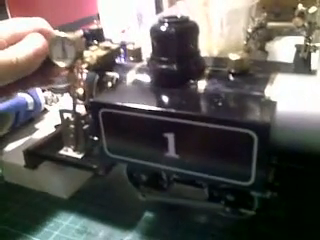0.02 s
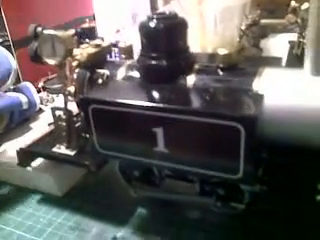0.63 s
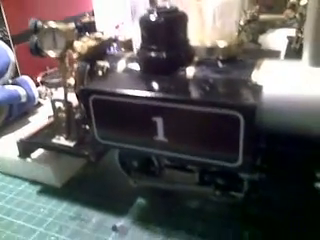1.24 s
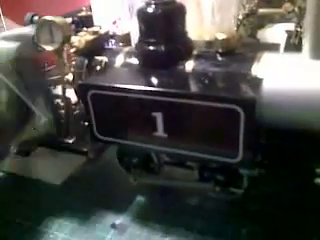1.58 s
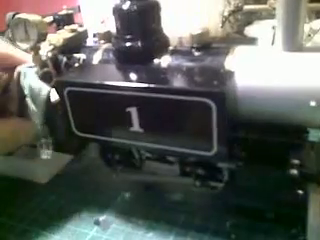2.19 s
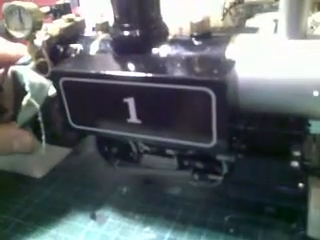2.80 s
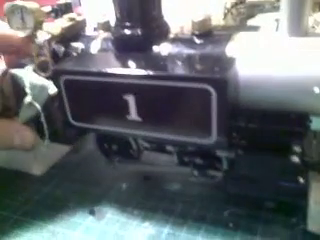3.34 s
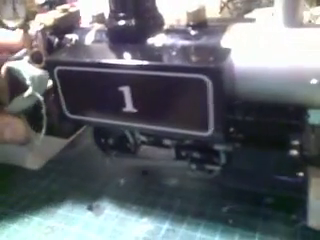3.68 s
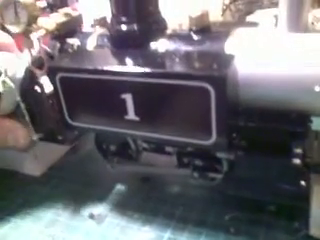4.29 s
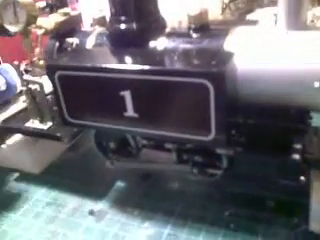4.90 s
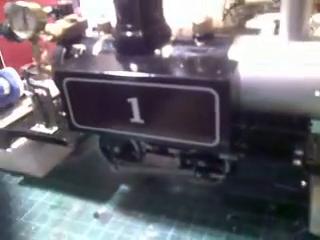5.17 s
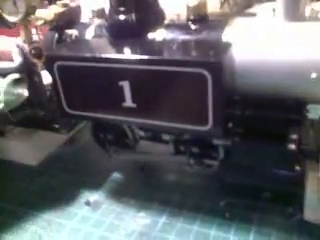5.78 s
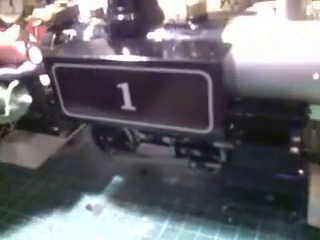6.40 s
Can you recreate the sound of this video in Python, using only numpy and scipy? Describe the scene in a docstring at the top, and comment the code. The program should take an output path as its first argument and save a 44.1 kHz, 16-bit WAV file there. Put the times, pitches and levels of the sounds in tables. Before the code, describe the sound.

Close up in a small room, small metal fittings click and clink unevenly as someone handles a model steam engine. Beneath them run a low, steady flame roar and a faint wet sputter. In the second half a rag rubs, metal scrapes and several knocks shake the stand, while a soft steam hiss grows. The clicking thins out and the steam gives a few short spurts.

```python
"""A workbench in a small room, the microphone close to a model live-steam locomotive standing in steam.
Up front, a hand works the cab fittings with a rag: metal clicks, rings and scrapes, the rag swishes,
and a few blows thud through the frame into the stand. Bench, boiler and walls answer each of them.
Underneath, the burner's flame roars softly in the flue, a wet leak fizzes and wavers,
and a jet of steam swells in the second half, with a few spurts near the end."""
import sys
import numpy as np
from scipy import signal
from scipy.fft import rfft, irfft
from scipy.io import wavfile
from scipy.ndimage import uniform_filter1d

SR = 44100
rng = np.random.default_rng(int(sys.argv[2]) if len(sys.argv) > 2 else 0)


def unload_audio(sound):
    """Save the sound as a 16-bit wav file, at the path given as the first command line argument."""
    columns = np.transpose(np.atleast_2d(sound))
    # keep every value between -1 and 1, then stretch to whole-number steps
    steps = np.round(np.clip(columns, -1, 1) * 32767)
    wavfile.write(sys.argv[1], SR, steps.astype(np.int16))


N = 292824
TIME = np.arange(N) / SR
RING_PER_KNOCK = -0.27  # dB of ring per dB of knock: firm knocks damp the free fitting

# Cab fittings clicking close to the microphone. Each row: start in seconds, relative level in dB,
# knock below 2 kHz in dB, brightness above 5 kHz in dB, chatter decay in seconds.
CLICKS = [(.038, -40.5, 0, 1, 0.0036), (0.054, -41, 3, 4, 0.0018), (.112, -33.5, -17, -5, .0026),
          (.158, -49, -8, -3, .002), (.222, -49, -8, -5, .002), (.273, -44.5, -12, -14, .002),
          (.396, -50, -6, 1, .002), (.462, -40, 10.5, -1, 0.0057), (.499, -33, 1, -8.5, 0.0011),
          (.573, -42.5, -10, -12, 0.003), (.607, -37.5, -22, -21, 0.0028), (.668, -34.5, -23, 1, 0.0045),
          (0.8184, -39, -6, 0.5, 0.0025), (.98, -38.5, -9, -23, 0.0016), (1.042, -30.5, -1, -3.5, 0.0016),
          (1.3275, -44, -13, -4, 0.0013), (1.418, -47.5, -10, -5, .001), (1.4844, -43, 9, -3, 0.0039),
          (1.644, -45.5, -6, -4, 0.005), (1.8468, -24.5, -9, -8.5, 0.0024), (1.852, -30.5, -9, -5, 0.0053),
          (2.0525, -46, -11, 3, 0.0015), (2.136, -48, -2, 4.5, .0026), (2.277, -40, -10, 1, 0.0026),
          (2.281, -28, -4, -6.5, 0.012), (2.3555, -30, -17, -4, 0.0033), (2.365, -28.5, -14, -15, 0.0038),
          (2.3862, -28, -19, -7, 0.0024), (2.455, -44.5, -9, -8, 0.0022), (2.755, -47.5, -8, 4, 0.0016),
          (2.786, -37, -3, -0.5, 0.0091), (2.965, -52, -6, 5, .0015), (3.085, -54, -6, 3, .002),
          (3.119, -48.5, -3, 5.5, 0.0037), (3.3101, -46.5, 14, 8.5, .0015), (3.3249, -19, -9.5, -9, 0.0011),
          (3.394, -40, -9, -12, 0.0018), (3.422, -41, -4, -10, .002), (3.456, -42.5, -8, -13, 0.0025),
          (3.48, -33, -7, -8, 0.00075), (3.53, -38.5, -3, -7, 0.0012), (3.569, -40.5, -3, -3, 0.00093),
          (3.7085, -27.5, -1.5, -1.5, .008), (3.7415, -35, 0, -5, .007), (3.766, -31.5, 1.5, -1, 0.0029),
          (3.8086, -49, -1, -13, .0015), (3.8319, -25, 1.5, -3.5, 0.003), (3.8702, -31, -2.5, -9, 0.0017),
          (3.899, -37.5, -8, -12, .0009), (3.981, -40, -15, -2, .0012), (4.014, -29, -12, -5.5, 0.0035),
          (4.1284, -35, 6, 3, 0.0026), (4.1645, -51, 9, 7, .002), (4.199, -53, -3, -4, .001),
          (4.238, -44, -7, 0, .0015), (4.262, -54, 0, -5, .001), (4.285, -39.5, 5, 2, .001),
          (4.323, -37.5, 1, 2.5, 0.0015), (4.347, -43.5, 6, 4, 0.00072), (4.362, -47.5, 7, 4.5, 0.0011),
          (4.41, -44, 8, 1, 0.00093), (4.437, -33.5, 7.5, 5.5, 0.0023), (4.469, -38, -1, -5, 0.00063),
          (4.49, -40, -12, 6.5, 0.0018), (4.529, -44, 5, 0, .0015), (4.584, -29, -12, 2.5, 0.00091),
          (4.767, -25, -2, -1.5, 0.00084), (4.869, -44, 2, -2, 0.0011), (4.888, -40.5, -2, 4, 0.0019),
          (4.92, -36.5, -14, 1, 0.0011), (5.162, -48.5, -8, 10, .003), (5.2666, -24.5, 5, 9.5, 0.0009),
          (5.269, -27.5, 5, 8, 0.0012), (5.274, -41, -6, 4, 0.001), (5.348, -46, -7, -6, .002),
          (5.4014, -31.5, -2, 1.5, 0.003), (5.4607, -37.5, -19, 2.5, 0.0041),
          (5.515, -41.5, -13, 2, 0.0034), (5.7883, -39.5, 3, 2, 0.00085), (5.847, -46, 12, -14, 0.0014),
          (6, -44, -3, -6, 0.0035), (6.113, -40.5, 3, -3, 0.0028), (6.141, -47.5, -3, 5, .003),
          (6.1673, -40.5, -13, -6, 0.0028), (6.2656, -45.5, 17, -8, .0012), (6.491, -48.5, 2, 7.5, 0.00063)]
def clicks(rise_s=0.00018, strike_s=0.00045, sing_hz=3505, sing_t60_s=0.089, size=4096):
    """Metal meets metal in a strike and a dying chatter; one free fitting sings on after it."""
    out, t = np.zeros(N), np.arange(size) / SR
    impact = np.sqrt(.01 * SR)  # the energy of 10 ms at rms 1
    for start, db, knock_db, bright_db, decay in CLICKS:
        contact = (1 - np.exp(-t / rise_s)) * np.exp(-t / decay)
        spectrum = rfft(rng.standard_normal(size) * contact)
        # a hard contact spreads its energy evenly over the bands
        spectrum /= np.sqrt(uniform_filter1d(abs(spectrum) ** 2, size=60))
        chatter = irfft(spectrum) * (t < t[-1] / 2)
        strike_share = strike_s / (strike_s + decay)
        force = np.sqrt(strike_share) * (t == 0) + np.sqrt(1 - strike_share) * chatter
        click = metal(force, knock_db, bright_db, edge_db=-4 + 0.39 * bright_db)
        add(out, start, gain_of(db) * impact * click)
        pitch_hz = sing_hz * rng.uniform(.993, 1.007)
        sing_db = db - 16 + RING_PER_KNOCK * knock_db - 60 * t / sing_t60_s
        add(out, start, gain_of(sing_db) * np.sin(2 * np.pi * pitch_hz * t))
    return out


# The fittings' tone from close by. Each row: frequency in Hz, relative level in dB.
METAL_SPECTRUM = [(40, -30), (280, -16.5), (480, -18.5), (750, -8), (1300, -16.5), (2300, -11),
                  (3000, -12.5), (5000, -20), (7000, -14.5), (7900, -24.5), (11500, -27.5), (14000, -20),
                  (16000, -66)]
# Their main resonances and dips, then their thin notes. Each row: centre in Hz, width in Hz, lift in dB.
METAL_RESONANCES = [(670, 210, 5.5), (996, 114, 11.5), (1356, 80, -17), (1690, 800, 11), (2070, 53, -13),
                    (2872, 105, -17), (3534, 1110, 15), (6460, 860, 8.5), (8320, 150, 7.5), (9850, 1840, 6)]
METAL_NOTES = [(3265, 60, 3), (3505, 50, 1), (3781, 50, 1.5), (5650, 45, 6), (5794, 45, 7), (6460, 60, 4),
               (6610, 50, 3), (6785, 50, 5), (9572, 50, 5)]
def metal(force, knock_db, bright_db, edge_db):
    """The fittings ring under a force: heavy blows add knock, hard ones treble, light ones one note."""
    corners_hz = [1800, 2400, 3950, 5000, 10000, 11200]
    tilt = lambda hz: np.interp(hz, corners_hz, [knock_db, 0, 0, bright_db, bright_db, edge_db])
    # each point of contact favours other resonances and has high notes of its own
    rings = [(hz, width, db + rng.uniform(-1.5, 1.5)) for hz, width, db in METAL_RESONANCES + METAL_NOTES]
    rings += [(rng.uniform(6000, 13360), 170, db) for db in 8.5 * rng.uniform(-0.67, 1, size=12)]
    free_fitting_hz = 3535 * rng.uniform(.98, 1.02)
    rings.append((free_fitting_hz, 154, 3 + RING_PER_KNOCK * knock_db))
    return colour(force, lambda hz: read(METAL_SPECTRUM, hz) + lifts(rings, hz) + tilt(hz), (2300, 5000))


# Fittings scraping in their seats. Each row: start in seconds, length in seconds,
# relative level in dB, brightness above 5 kHz in dB.
SCRAPES = [(-.02, 0.14, -39.5, -1.5), (0.319, 0.24, -53, 1), (3.335, 0.059, -43, 1.5),
           (3.491, .14, -50, -10), (3.711, 0.13, -41, -5.5), (3.824, 0.084, -61, -4), (4.137, 0.12, -50, 3),
           (4.287, 0.27, -64, -6), (4.593, 0.038, -51, 5), (4.87, 0.17, -60.5, 10.5),
           (5.276, .07, -51, -12), (5.982, 0.034, -59, 8)]
def scrapes(knock_db=-4, clump_db=3, clump_hz=70):
    """Metal rubs on metal in a crowd of small slips that come in clumps under a soft stroke."""
    out = np.zeros(N)
    for start, length, db, bright_db in SCRAPES:
        count = round(length * SR)
        slips = evened(grains(1100, 2.8, count) * gain_of(clump_db * flutter(clump_hz, count)))
        force = np.pad(slips * signal.windows.tukey(count, .4), (0, SR // 20))
        add(out, start, gain_of(db) * metal(force, knock_db, bright_db, edge_db=bright_db - 2))
    return out


# Rag, fingers or a tool sliding over the cab. Each row: start in seconds, length in seconds, level in dB.
SWISHES = [(0.377, 0.12, -57), (0.855, 0.035, -54), (1.27, 0.036, -56), (1.467, 0.053, -57),
           (4.126, 0.13, -51), (4.28, 0.27, -49), (4.585, 0.025, -52), (5.262, 0.017, -32),
           (5.294, 0.105, -48.5), (5.929, 0.1, -57.5), (6.102, 0.042, -53), (6.4, 0.018, -64),
           (6.483, 0.029, -53.5)]
# The tone of the sliding. Each row: frequency in Hz, relative level in dB.
SWISH_SPECTRUM = [(500, -21), (2200, 14), (2900, -19), (3500, -3), (4900, 10.5), (5600, 0), (6600, -10),
                  (7700, -7), (8700, 0), (9300, 2), (10100, 7.5), (11200, -16), (14000, -6), (15200, -41)]
def swishes(clump_db=6, clump_hz=90):
    """Surfaces catch and slip under each stroke: a gritty hiss that comes in clumps."""
    out = np.zeros(N)
    for start, length, db in SWISHES:
        count = round(length * SR)
        grit = evened(grains(700, 3.8, count) * gain_of(clump_db * flutter(clump_hz, count)))
        add(out, start, gain_of(db) * grit * signal.windows.tukey(count, .4))
    return colour(out, lambda hz: read(SWISH_SPECTRUM, hz), (2000, 14000))


# Thin, very high snaps at the cab. Each row: start in seconds, level in dB, decay in seconds.
SNAPS = [(0.459, -47.5, .014), (.499, -61, 0.0026), (0.861, -46.5, .02), (2.472, -37, 0.0047),
         (3.326, -45, .002), (3.48, -45, .003), (3.71, -47, .005), (3.832, -52, .005), (3.871, -41, .002),
         (4.014, -46, .003), (4.285, -37, .005), (5.267, -31, .004), (5.402, -47, .004)]
# Their tone. Each row: frequency in Hz, relative level in dB.
SNAP_SPECTRUM = [(2000, -19), (6000, 3), (9000, -1), (12000, 3), (14500, -2), (16000, -30)]
def snaps():
    """Something light catches on an edge and gives a quickly dying burst of noise."""
    out, t = np.zeros(N), np.arange(SR // 20) / SR
    for start, db, decay in SNAPS:
        add(out, start, gain_of(db) * rng.standard_normal(len(t)) * np.exp(-t / decay))
    return colour(out, lambda hz: read(SNAP_SPECTRUM, hz), (6000, 14000))


# Blows that shake frame and stand. Each row: start in seconds, relative level in dB,
# most excited pitch in Hz, spread in octaves.
THUMPS = [(3.325, -30, 219, 0.6), (4.1284, -31, 800, 0.5), (4.4384, -36, 980, 0.32),
          (4.5838, -33.5, 724, .4), (4.766, -25, 520, 1.6), (5.2668, -23.5, 830, 0.49),
          (6.266, -43, 1000, .25)]
# The tone of the stand on the bench. Each row: frequency in Hz, relative level in dB.
STAND_SPECTRUM = [(40, -10.5), (130, 0.5), (190, -4.5), (320, 2), (520, -4.5), (730, 8), (1000, 4),
                  (1400, -22), (3000, -33)]
def thumps(size=4096):
    """One short push goes through the frame into the stand: a broad, dry thud around its own pitch."""
    out = np.zeros(N)
    push = np.sqrt(.01 * SR) * signal.unit_impulse(size)
    for start, db, pitch_hz, spread in THUMPS:
        falloff_db = lambda hz: 10 * np.log10(1 + (np.log2((hz + 1) / pitch_hz) / spread) ** 2)
        thud = colour(push, lambda hz: read(STAND_SPECTRUM, hz) - falloff_db(hz), (60, 2000))
        add(out, start, gain_of(db) * thud)
    return out


def ticks(per_s=20, decay_s=0.001):
    """The hot, loose fittings tick faintly at random."""
    contacts = grains(per_s, 1.2, N)
    t = np.arange(SR // 100) / SR
    chatter = rng.standard_normal(len(t)) * np.exp(-t / decay_s)
    force = evened(signal.oaconvolve(contacts, chatter)[:N])
    return gain_of(-64.5) * metal(force, knock_db=-8, bright_db=-3, edge_db=-7)


# The burner's tone from beside the engine. Each row: frequency in Hz, relative level in dB.
BURNER_SPECTRUM = [(20, -16), (60, -16.5), (120, -14), (230, -10.5), (460, -13.5), (750, -3), (1100, -5.5),
                   (1400, -12), (1850, -4.5), (2050, -24), (2600, -34), (3200, -24.5), (6000, -77),
                   (14000, -39.5), (15200, -79)]
# Resonances of flue and boiler. Each row: centre in Hz, width in Hz, lift in dB.
FLUE_RESONANCES = [(229.4, 56.5, 6.35), (302, 111, 6.4), (696.5, 99, 6.25), (858, 47, 1.8), (995, 123, 6),
                   (1317, 33, 8), (1493, 97, 6.8), (1635, 178, 9.8), (1766, 77, 3.5), (2360, 29, 4.6)]
# The flame's roar, then the draught's rumble. Each row: time in seconds, relative level in dB.
FLAME_LEVEL = [(0.0, -41.5), (0.63, -38.5), (0.81, -40), (1.24, -37.5), (2.27, -38), (2.5, -40.5),
               (2.68, -40), (2.88, -37.5), (4.08, -42.5), (4.23, -40.5), (5.36, -40.5), (5.79, -43),
               (6.21, -39), (6.64, -39.5)]
DRAUGHT_LEVEL = [(0.0, -50), (0.85, -47.5), (5.31, -49), (5.86, -52.5), (6.14, -48), (6.64, -49)]
def burner(split_hz=460, flutter_hz=62):
    """The flame flutters and sounds the flue; the draught rumbles below it."""
    flue_db = lambda hz: read(BURNER_SPECTRUM, hz) + lifts(FLUE_RESONANCES, hz)
    low_share = lambda hz: 1 / (1 + (hz / split_hz) ** 10)
    flame = rng.standard_normal(N) * gain_of(1.94 * flutter(flutter_hz, N))
    roar = colour(flame, lambda hz: flue_db(hz) + 10 * np.log10(1 - low_share(hz) + 1e-6), (500, 2000))
    draught = rng.standard_normal(N)
    rumble = colour(draught, lambda hz: flue_db(hz) + 10 * np.log10(low_share(hz) + 1e-6), (100, 400))
    return gain_of(-0.57) * roar * level(FLAME_LEVEL) + gain_of(1) * rumble * level(DRAUGHT_LEVEL)


# The leak's tone, faint even this close. Each row: frequency in Hz, relative level in dB.
LEAK_SPECTRUM = [(500, -1.5), (2300, 2.5), (2900, -11), (3450, -0.5), (4400, -10), (5400, -14.5),
                 (6500, -0.5), (7700, -11), (9700, -11.5), (11300, -14), (14000, -12), (15200, -66)]
def steam_leak(sputter_db=4, sputter_hz=26, wander_db=4.5, wander_hz=1):
    """Wet steam sputters out with tiny bursting drops, its level slowly wandering."""
    drops = gain_of(-14.5) * grains(1500, 2, N)
    hiss = gain_of(-4) * rng.standard_normal(N)
    fizz = (hiss + drops) * gain_of(sputter_db * flutter(sputter_hz, N))
    leak = colour(fizz, lambda hz: read(LEAK_SPECTRUM, hz), (5700, 14000))
    return leak * gain_of(-61 + wander_db * flutter(wander_hz, N))


# The jet's tone. Each row: frequency in Hz, relative level in dB.
JET_SPECTRUM = [(1000, -35), (2200, 6.5), (2900, -2), (3500, 2.5), (4700, 4.5), (5500, -13.5), (8000, -44),
                (10000, -13), (14000, -41), (15200, -70)]
# Its swell. Each row: time in seconds, relative level in dB.
JET_LEVEL = [(0.0, -62), (1.13, -61), (2.72, -62), (4.12, -57.5), (4.35, -54.5), (4.83, -54), (5.33, -50),
             (5.59, -57.5), (6.64, -53.5)]
# Its spurts. Each row: middle in seconds, length in seconds, lift in dB.
JET_SPURTS = [(5.95, 0.036, 8.5), (6.05, 0.075, 8), (6.41, 0.026, 8), (6.475, 0.062, 9)]
def steam_jet(flutter_db=2, flutter_hz=37):
    """A smoother jet of steam hisses, swelling later on and spurting near the end."""
    spray = rng.standard_normal(N) * gain_of(flutter_db * flutter(flutter_hz, N))
    jet = colour(spray, lambda hz: read(JET_SPECTRUM, hz), (2000, 6000))
    return jet * level(JET_LEVEL) * gain_of(lifts(JET_SPURTS, TIME))


# First reflections off bench and boiler. Each row: delay at the microphone in seconds, level in dB.
ECHOES = [(.0036, -16.5), (.0086, -20)]
# The small room around the bench. Each row: frequency in Hz, time to fade by 60 dB in seconds.
ROOM_T60 = [(200, 0.16), (1000, 0.12), (3500, 0.2), (7000, 0.18), (14000, 0.13)]
def room(x, tail_db=-8.5, spacing=20):
    """Bench and boiler throw the sound back; dense reflections follow, each band dying at its own rate."""
    taps = np.zeros(SR // 2)
    slots = np.arange(SR // 250, len(taps) - spacing, spacing)
    taps[slots + rng.integers(0, spacing, len(slots))] = rng.choice([-1., 1.], len(slots))
    hz, t, bands = signal.stft(taps, SR, nperseg=256)
    fade = gain_of(-60 * t / read(ROOM_T60, hz)[:, None])
    tail = signal.istft(bands * fade, SR, nperseg=256)[1]
    reflections = gain_of(tail_db) * signal.fftconvolve(x, tail / np.linalg.norm(tail))[:N]
    for delay, db in ECHOES:
        add(reflections, delay, gain_of(db) * x)
    return reflections


def gain_of(db):
    """Decibels to amplitude."""
    return 10 ** (np.asarray(db) / 20)


def evened(x):
    """Scales to rms 1."""
    return x / np.sqrt(np.mean(x ** 2) + 1e-20)


def read(points, hz):
    """Interpolates rows of (Hz, value) on a log-frequency axis."""
    point_hz, value = np.transpose(points)
    return np.interp(np.log(hz + 1), np.log(point_hz + 1), value)


def level(curve):
    """Turns rows of (seconds, dB) into a gain for every sample."""
    return gain_of(np.interp(TIME, *np.transpose(curve)))


def lifts(bells, x):
    """Sums bell-shaped lifts, rows of (centre, width, dB), along frequency or time."""
    return sum(db * 2 ** -(2 * (x - centre) / width) ** 2 for centre, width, db in bells)


def add(mix, start_s, sound):
    """Mixes a sound in, trimming what falls outside the mix."""
    start = round(start_s * SR)
    sound = sound[max(-start, 0):]
    part = mix[max(start, 0):][:len(sound)]
    part += sound[:len(part)]


def colour(x, db_of, band_hz, size=8192):
    """Causal filter with a dB response; white noise of rms 1 comes out with rms 1 inside the band."""
    hz = abs(np.fft.fftfreq(size, 1 / SR))
    log_gain = db_of(hz) * np.log(10) / 20
    response = np.exp(np.conj(signal.hilbert(log_gain)))  # minimum phase
    response /= np.sqrt(np.mean(abs(response) ** 2 * (hz > band_hz[0]) * (hz < band_hz[1])))
    return signal.oaconvolve(x, np.fft.ifft(response).real[:size // 2])[:len(x)]


def flutter(rate_hz, count):
    """Random motion, mostly slower than rate_hz, of rms about 1."""
    hz = np.fft.rfftfreq(N, 1 / SR)
    spectrum = rfft(rng.standard_normal(N)) / (1 + (hz / rate_hz) ** 2)
    return evened(irfft(spectrum, N))[:count]


def grains(per_s, spread_db, count):
    """Sparse tiny impacts of uneven size, rms 1."""
    sizes = gain_of(spread_db * np.minimum(rng.exponential(1, count), 4))
    return evened(sizes * rng.choice([-1, 1], count) * (rng.random(count) < per_s / SR))


def scene():
    """At the bench, in mono: the handling and its reflections over the burner and the steam."""
    handling = gain_of(-1.3) * clicks() + gain_of(-1) * scrapes()
    handling += swishes() + snaps() + thumps() + ticks()
    return (handling + room(handling) + burner() + steam_leak() + gain_of(3) * steam_jet())[None]


def record(dry, cutoff_hz=15800):
    """The camera's microphone, close to the engine, loses the very top of the treble."""
    lowpass = signal.firwin(255, cutoff_hz, window=("kaiser", 8), fs=SR)
    return signal.oaconvolve(dry, lowpass[None], "same")


dry = scene()
out = record(dry)
unload_audio(out)
```